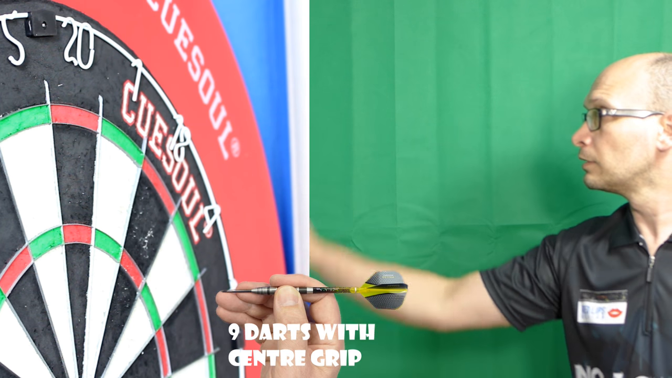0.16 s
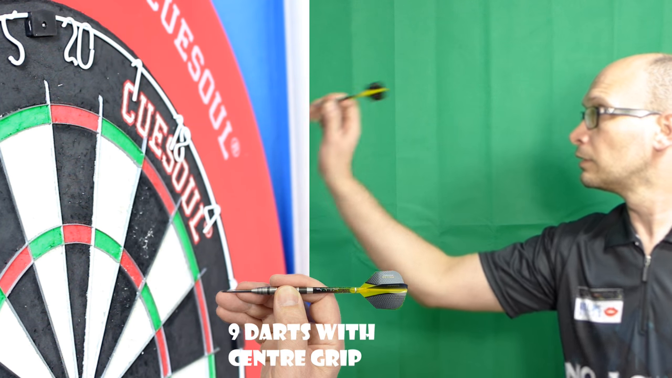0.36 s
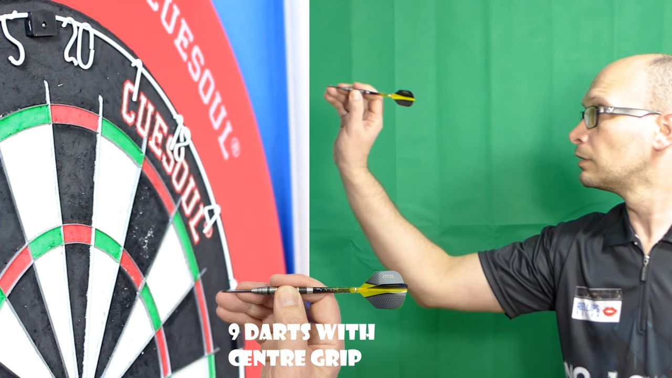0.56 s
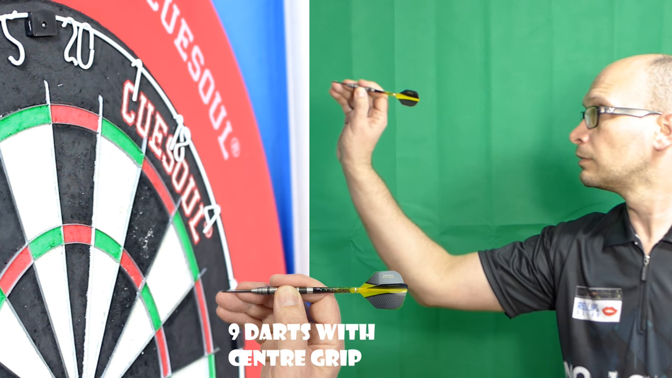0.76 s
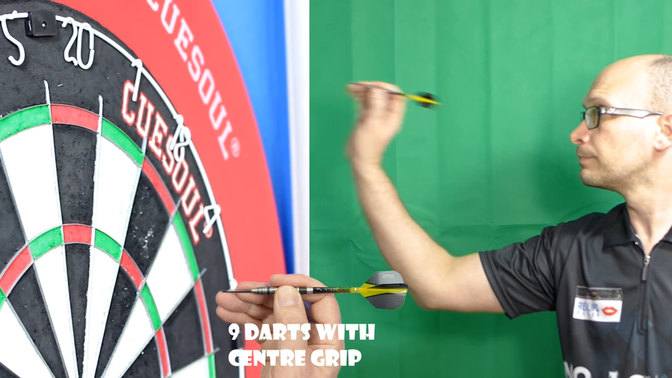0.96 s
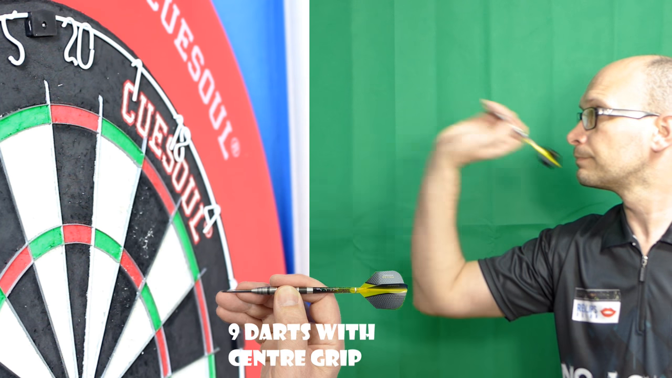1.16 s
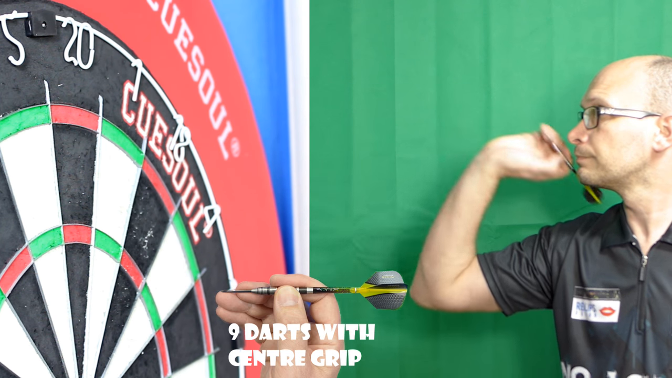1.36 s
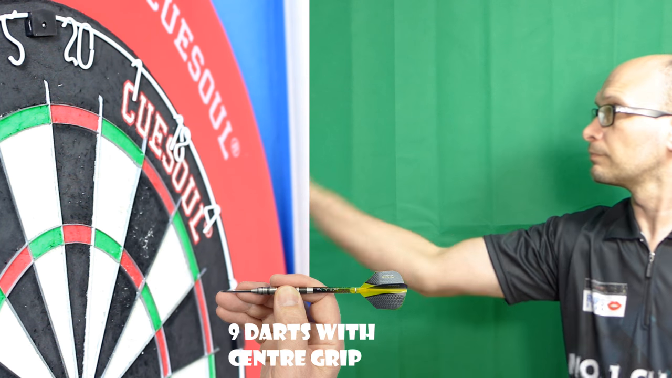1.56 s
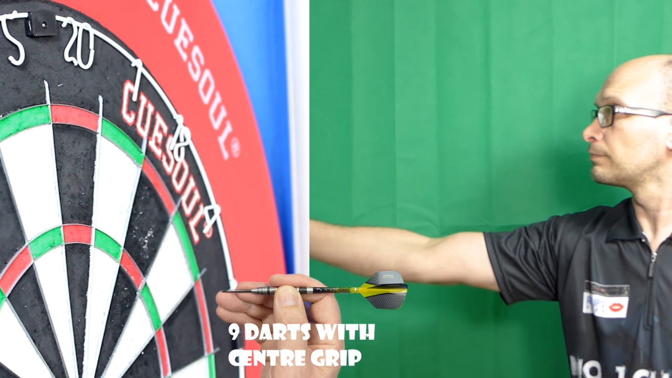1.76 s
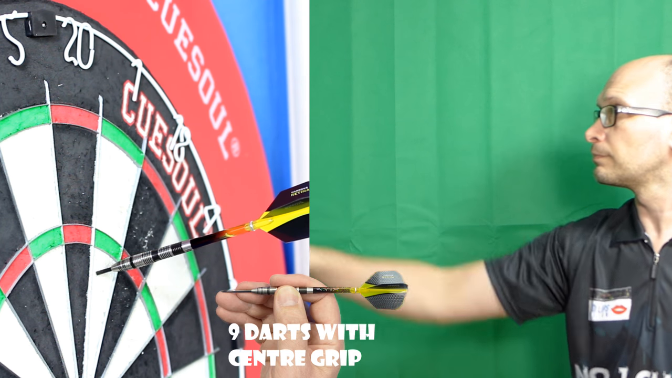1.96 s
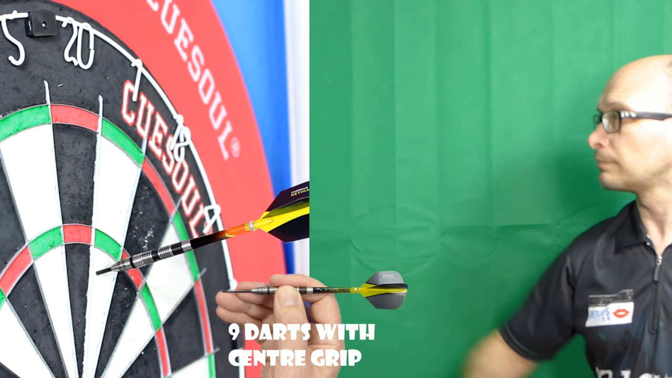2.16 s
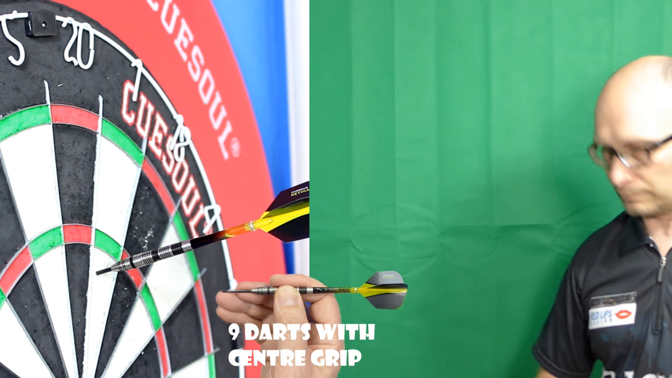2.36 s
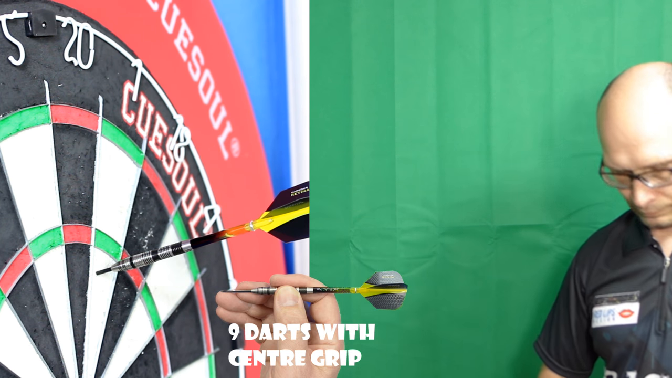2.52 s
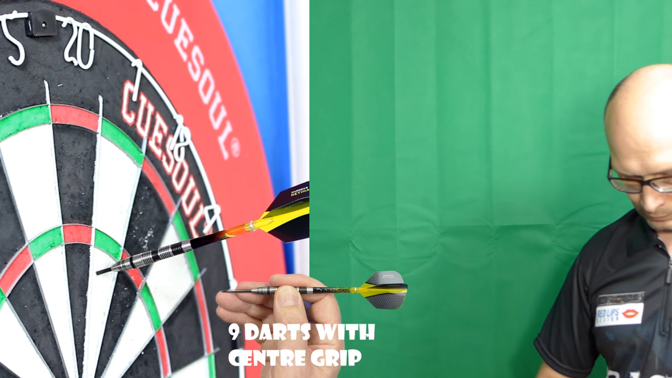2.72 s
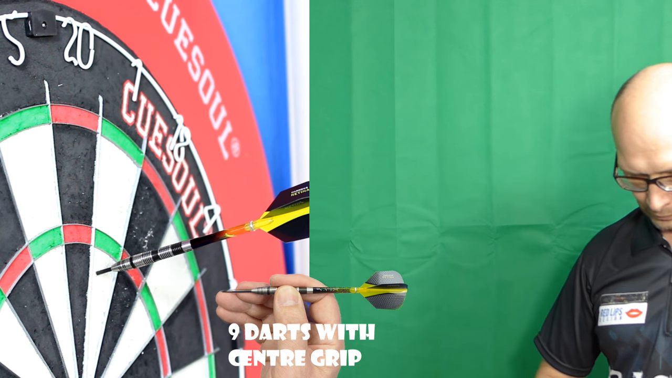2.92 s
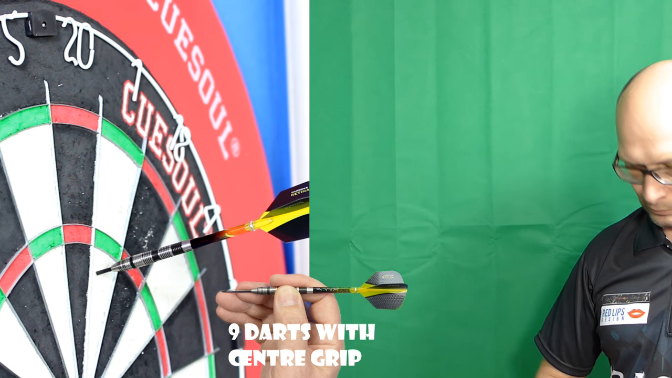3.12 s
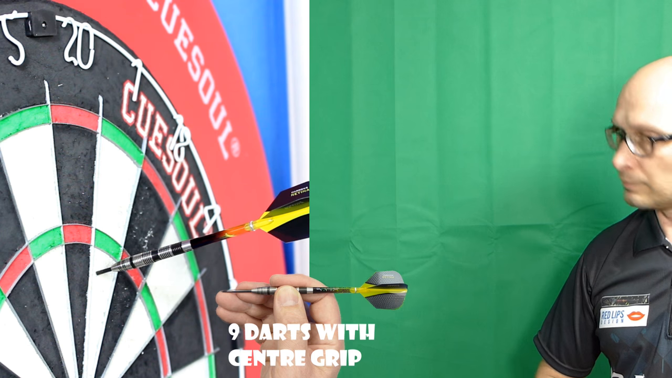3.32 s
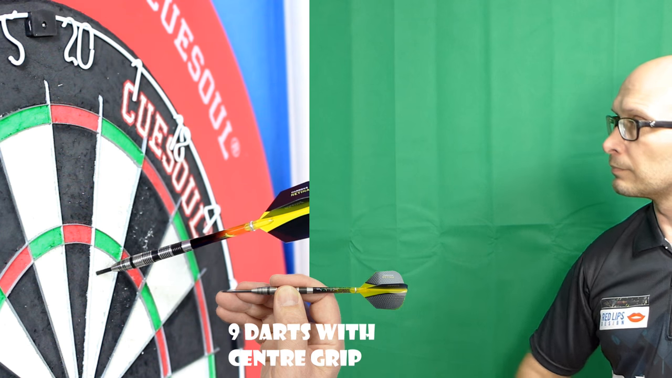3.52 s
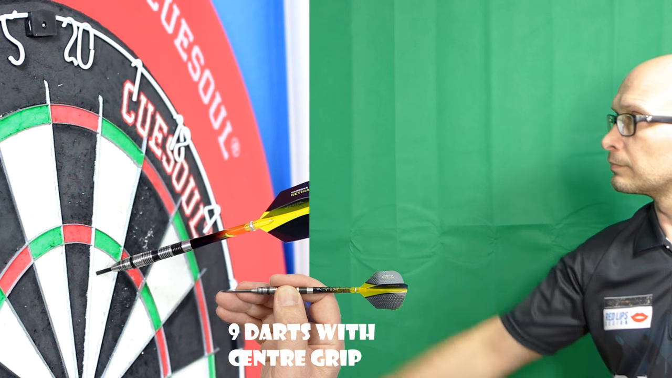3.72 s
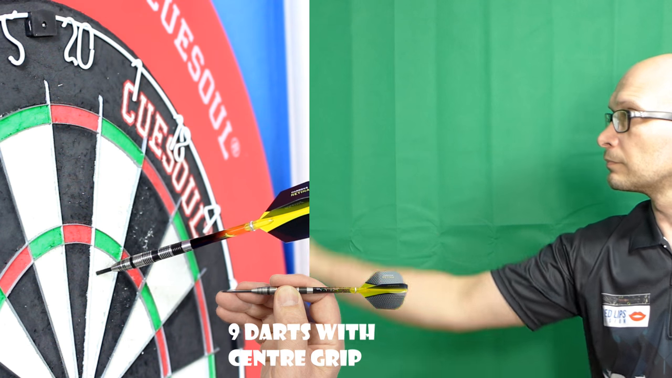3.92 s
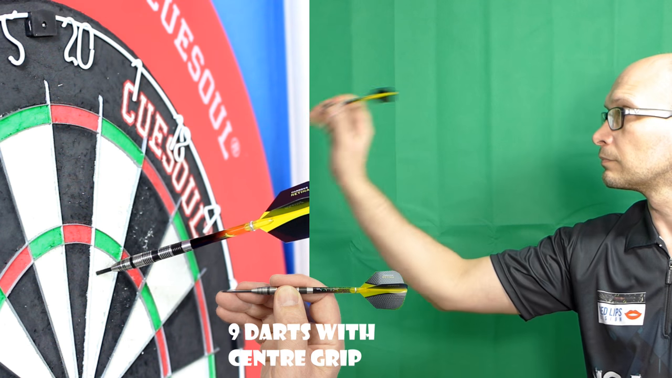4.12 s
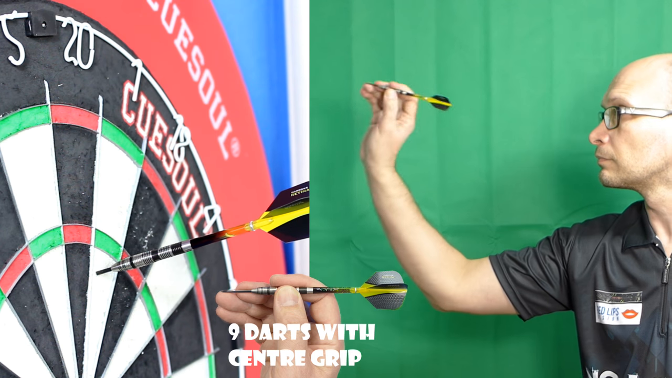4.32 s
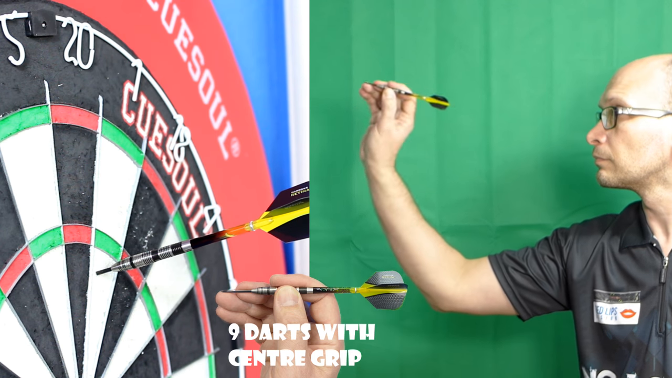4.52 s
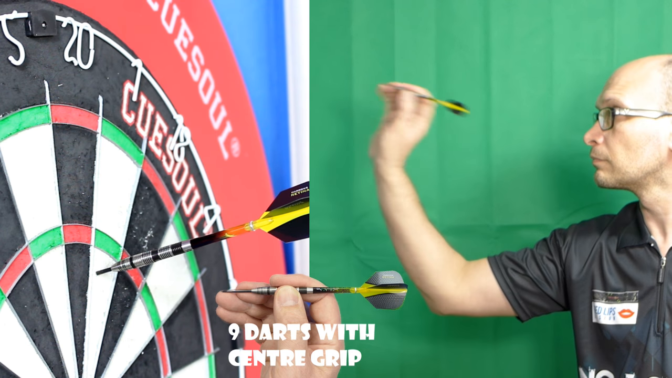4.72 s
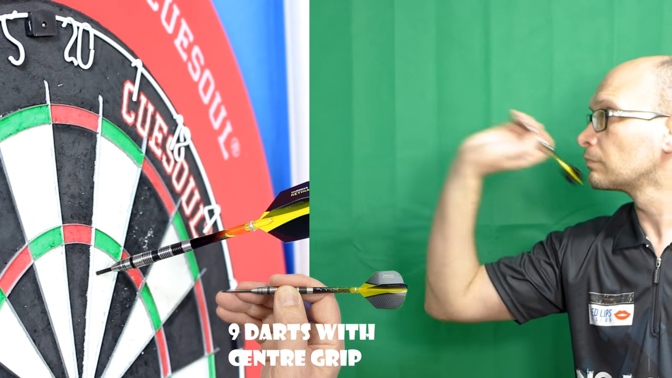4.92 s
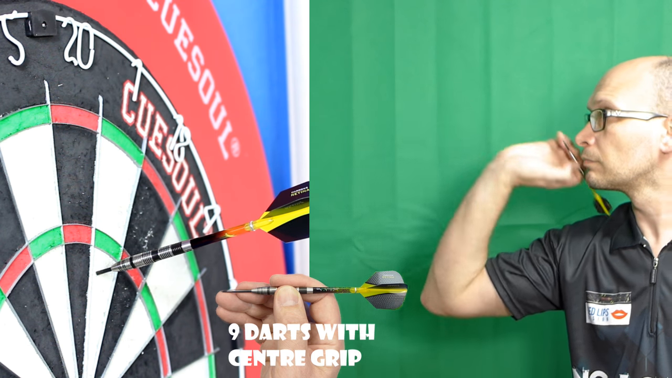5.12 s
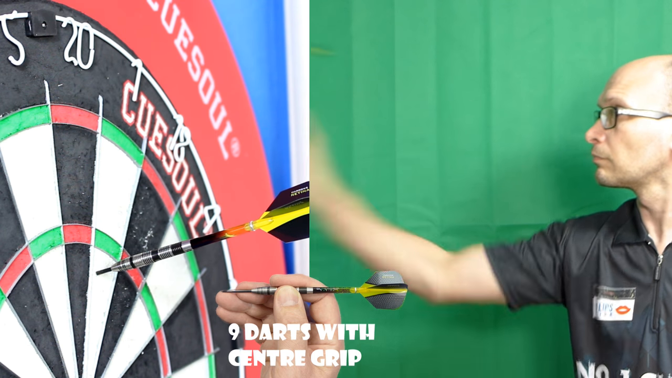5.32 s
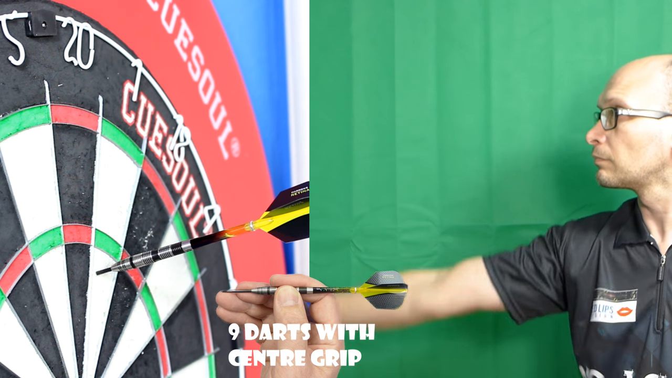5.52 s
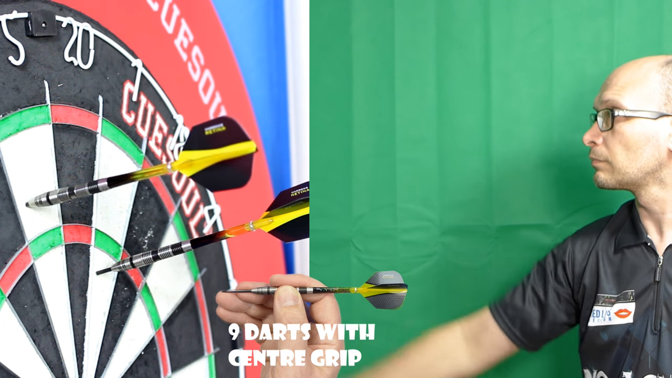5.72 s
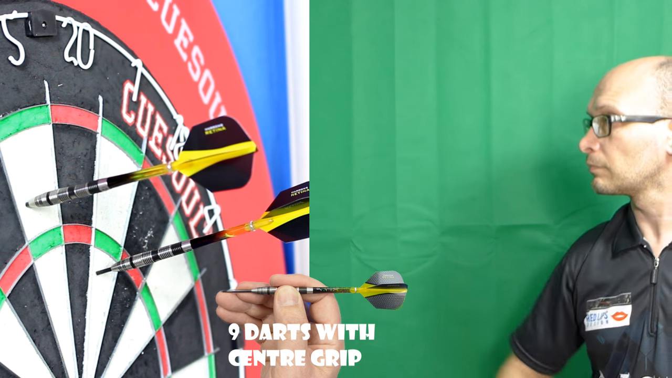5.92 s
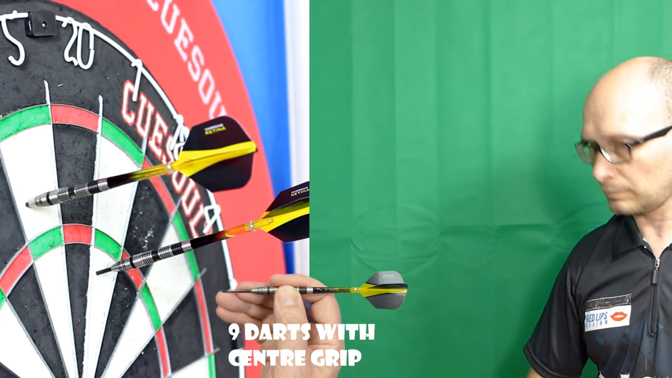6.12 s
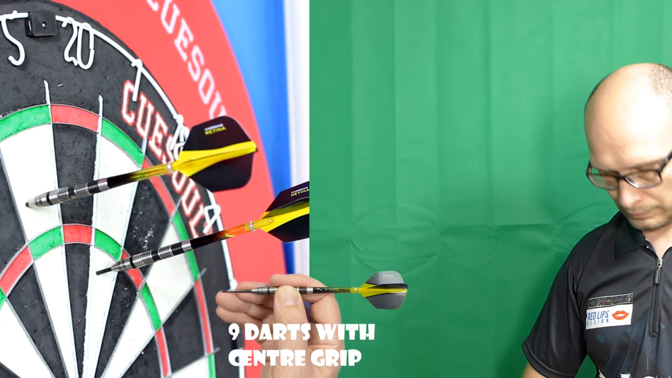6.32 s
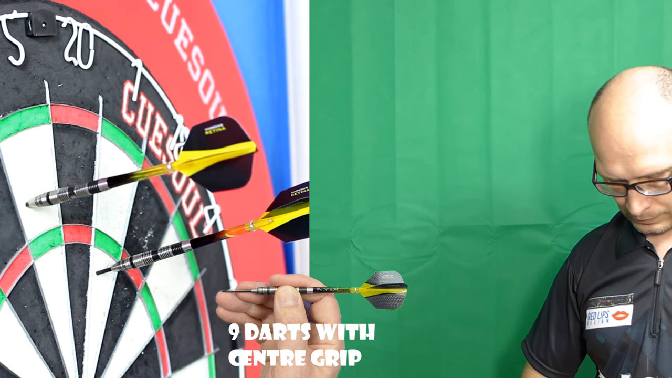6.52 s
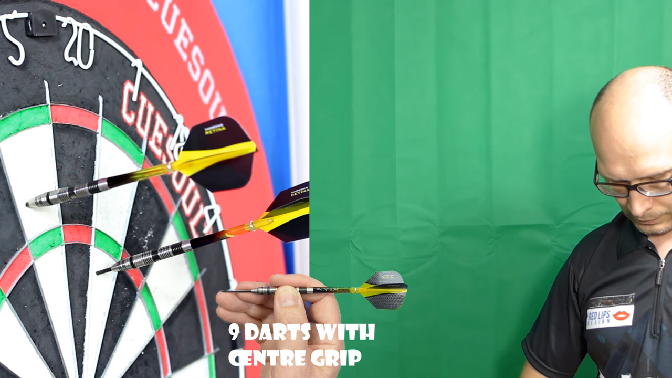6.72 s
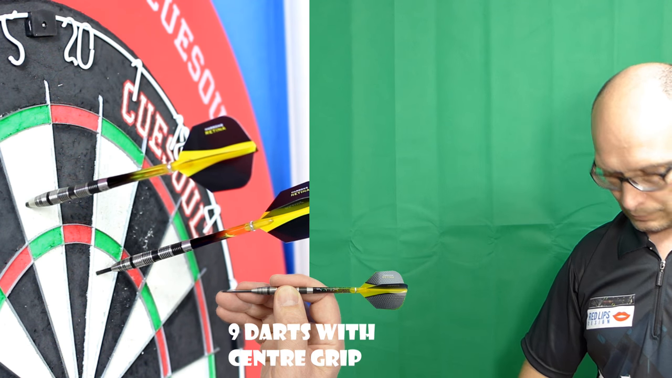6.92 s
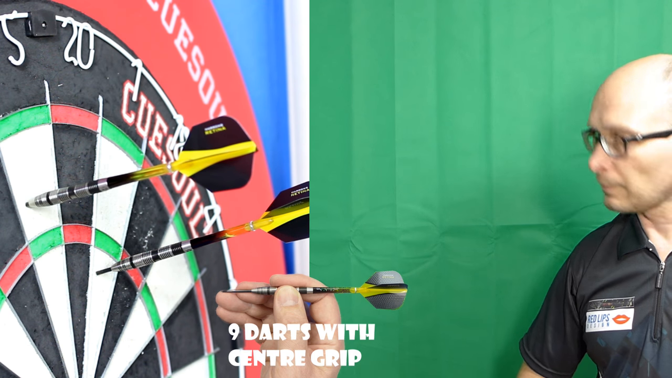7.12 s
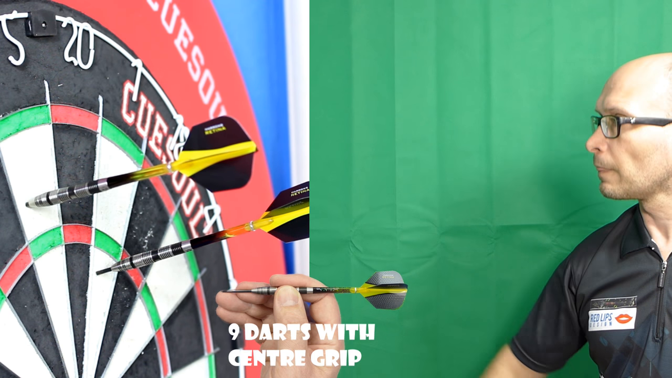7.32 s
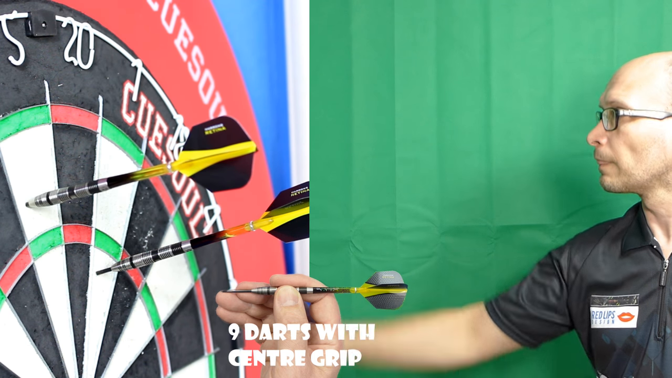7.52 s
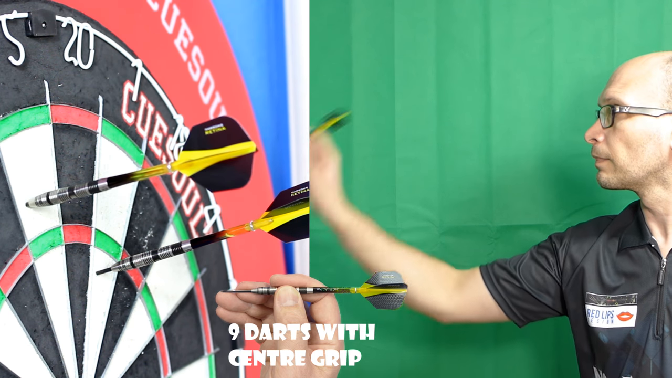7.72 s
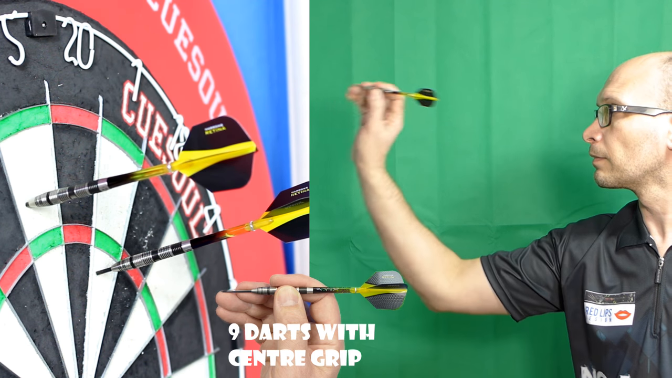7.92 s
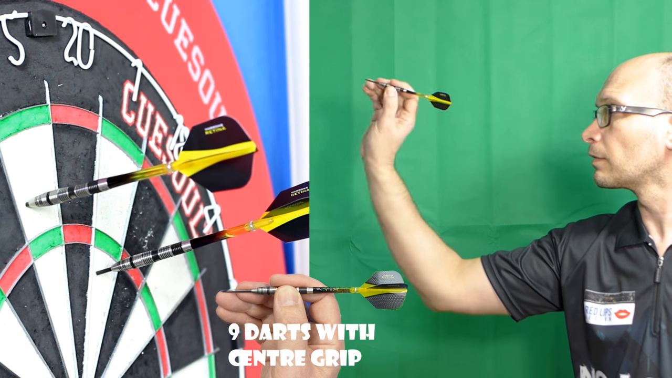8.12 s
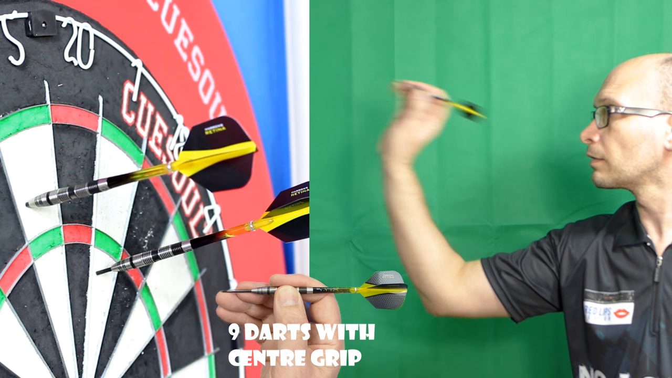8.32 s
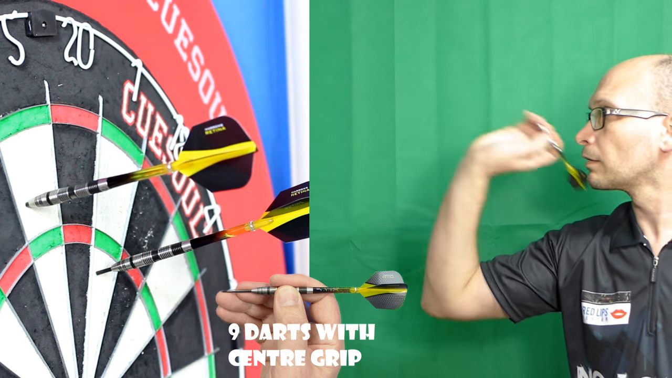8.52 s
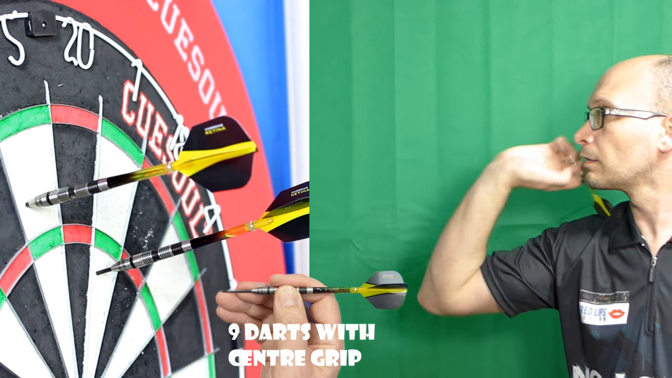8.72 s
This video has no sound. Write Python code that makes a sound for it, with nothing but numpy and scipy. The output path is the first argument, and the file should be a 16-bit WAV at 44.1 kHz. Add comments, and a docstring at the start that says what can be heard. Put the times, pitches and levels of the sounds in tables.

```python
"""Steel-tip darts in a quiet room

A player throws darts near a camera microphone pair. The flight scrapes the chin on the draw and flicks off it
at release: noise grains in three tones. Two darts thud into a bristle board: decaying sine modes with delayed
repeats boom under a crunch of room-decaying noise. A third draw ends the scene with no landing.
Shirt rustle (patchy noise), faint ticks (short noisy rings), a wavering narrow hum, a whine and hiss lie below.
"""
import sys
import numpy as np
from scipy import signal
from scipy.fft import rfft, irfft
from scipy.io import wavfile
from scipy.ndimage import uniform_filter1d

SR = 44100
rng = np.random.default_rng(int(sys.argv[2]) if len(sys.argv) > 2 else 0)


def int16_out(signal):
    """Quantize to a 16-bit WAV file."""
    q = np.round(np.clip(np.atleast_2d(signal).T, -1, 1) * 32767)
    wavfile.write(sys.argv[1], SR, q.astype(np.int16))


N = 386448  # length of the scene [samples]


def darts():
    """Each blow rings the board modes under a dense crunch of noise that decays with the room."""
    # darts landing: (time [s], level [dB], crunch share [dB], crunch top [dB], crunch bass [dB],
    # knock around 2 kHz [dB])
    landings = [(1.88, -26, -0.5, 6, 6.5, -2.5), (5.672, -22.5, 0.5, 2, 2, 0.5)]
    # point pushing into the fibres: (frequency [Hz], level [dB per Hz])
    fibre_colour = [(35, -63), (60, -40), (256, -18), (346, -5), (437, -1.5), (566, -8), (636, -6),
                    (1010, -9.5), (1250, -19.5), (2000, -20), (3120, -41), (4120, -36.5), (8710, -46),
                    (10800, -41), (16000, -68.5)]
    boom = board_boom()
    t = np.arange(SR) / SR
    fade_in = np.minimum(t / 0.00025, 1)
    fade_out = np.minimum(2 * (1 - t), 1)
    out = np.zeros((2, N))
    for start, db, crunch_db, top_db, bass_db, knock_db in landings:
        crunch = colour(tail(SR, 0.00112), fibre_colour)
        crunch = colour(crunch, [(220, bass_db), (300, 0), (1000, 0), (16000, top_db)])
        crunch /= opening_rms(crunch)
        blow = boom + from_db(crunch_db) * crunch
        blow = colour(blow, [(1100, 0), (1400, knock_db), (2700, knock_db), (3600, 0)])
        add(out, start, from_db(db) * blow * fade_in * fade_out)
    return out


def board_boom():
    """Decaying modes of board and backing, swelled by delayed repeats, over one low decaying thump."""
    # modes of board and backing: (frequency [Hz], level [dB], 60 dB decay, held to at most 0.5 [s])
    modes = [(272.8, -23, 0.38), (324.1, 2, 0.476), (353.14, 3, 0.475), (386.9, 3.5, 0.387),
             (432.7, -11, 0.38), (476.1, 0.5, 0.38), (502.2, 6, 0.25), (554, 9, 0.32), (595, 6, 0.143),
             (607.4, -7.5, 0.176), (677, -14.5, 0.14), (720, 3, 0.3), (752.7, -4, 0.49), (774, -3, 0.21),
             (833.4, 8.5, 0.3), (881.3, 2, 0.294), (909, -13, 0.74), (933.6, -3, 0.414), (1007, -9, 0.31),
             (1050.4, -7.5, 0.2), (1107, -16, 0.394), (1134.3, -14, 0.345), (1370, -15, 0.29),
             (1592.5, -15.5, 0.59), (1740, -19, .25), (1950, -9, 0.42), (2029, -11.5, 0.45),
             (2086, -15, 0.4)]
    # delayed repeats that shape the swell of the boom: (delay [s], level [dB])
    repeats = [(.009, 2.5), (.031, 2.5), (.047, -10), (.057, -2.5), (.084, -9.5), (.140, -18)]
    thump_hz, thump_db, thump_decay_s = 45, -25.5, 0.047
    t = np.arange(SR) / SR
    ring = np.zeros(SR)
    for k, (hz, db, t60) in enumerate(modes):
        # alternating signs soften the start of the boom
        ring += (-1) ** k * from_db(db - 60 * t / min(t60, 0.5)) * np.sin(2 * np.pi * hz * t)
    boom = ring.copy()
    for delay, db in repeats:
        lag = int(delay * SR)
        boom[lag:] += from_db(db) * ring[:SR - lag]
    # keep the abrupt mode starts from adding low rumble
    boom = signal.sosfilt(signal.butter(3, 240, "high", fs=SR, output="sos"), boom)
    boom /= opening_rms(boom)
    thump = np.sin(2 * np.pi * thump_hz * t) * np.exp(-t / thump_decay_s)
    return boom + from_db(thump_db) * thump


def flight():
    """Dragging the flight on the chin, then letting it spring off, opens its body, edge and ring tones."""
    # drags along the chin: (time of touch [s], swell [s], hold [s], peak level [dB],
    # hollow ring [dB relative to the body], bright edge [dB relative to the body])
    scrapes = [(1.322, 0.0432, 0.039, -48, -28, 0), (5.025, 0.0107, 0.0345, -53, -17, 7),
               (5.097, 0.0069, .008, -50, -7.5, 3.5), (8.609, 0.0527, 0.0194, -50, -23, 1)]
    # springing off at release: (time [s], level [dB], snap length [s], quiver decay [s],
    # ring [dB relative to the body], edge [dB relative to the body])
    flicks = [(1.511, -43, 0.011, 0.0212, -18.5, 1.5), (5.2965, -37.5, 0.011, 0.0122, -8.5, 2)]
    # how the grip stiffens the flight on each throw: (from time [s], body band low edge [Hz],
    # body peak [Hz], ring [Hz], ring width [Hz])
    grips = [(0, 4623, 5290, 2016, 200), (4, 4110, 5210, 2050, 306), (8, 4700, 5800, 2300, 900)]
    ring_db_per_s, edge_db_per_s = 109, -87.5  # along a stroke the ring grows and the edge dulls
    body_level, edge_level, ring_level = np.zeros((3, N))
    for start, swell, hold, db, ring_db, edge_db in scrapes:
        t, shape_db = stroke(swell, hold)
        add(body_level, start, from_db(db + shape_db))
        add(edge_level, start, from_db(db + shape_db + edge_db + edge_db_per_s * t))
        add(ring_level, start, from_db(db + shape_db + ring_db + ring_db_per_s * t))
    t = np.arange(SR // 4) / SR
    for start, db, length, quiver, ring_db, edge_db in flicks:
        snap = np.minimum(t / 0.005, 1) * (t < length)
        shape = snap + from_db(-1.0) * (t >= length) * np.exp(-(t - length) / quiver)
        add(body_level, start, from_db(db) * shape)
        add(edge_level, start, from_db(db + edge_db) * snap)
        add(ring_level, start, from_db(db + ring_db) * shape)
    tones = np.zeros((3, N))
    for start, *grip_hz in grips:
        first = int(start * SR)
        tones[:, first:] = flight_tones(*grip_hz)[:, first:]
    return np.sum(tones * [body_level, edge_level, ring_level], axis=0)


def flight_tones(low_hz, peak_hz, ring_hz, width_hz):
    """Stubble plucks the thin plastic in dense uneven grains: body band, bright edge and hollow ring."""
    # colour of the rubbed flight: (frequency [Hz], level [dB per Hz])
    plastic_colour = [(1000, -10.5), (1700, -1), (2500, -6.5), (3300, -9), (4000, -4), (4700, -1.5),
                      (5400, 1), (6200, -4), (6800, -4), (10700, -6.5), (12200, -8.5), (12800, -17),
                      (15000, -17.5), (16000, -31)]
    grains = rng.standard_normal(N) * from_db(2.97 * walk(400))
    hiss = colour(grains, plastic_colour)
    body = colour(hiss, [(0.6 * low_hz, -17), (0.89 * low_hz, -13), (low_hz, -3),
                         (peak_hz, 2), (6600, -3), (8000, -30)])
    edge = colour(hiss, [(6000, -18), (7500, -2.5)])
    ring = band(grains, ring_hz, width_hz)
    return np.array([unit(body), unit(edge), unit(ring)])


def stroke(swell, hold):
    """Time and dB shape of one drag: touch, swell, hold, then a fade as the flight leaves the skin."""
    touch_db, lift_db_per_s = -9.5, 335.5  # first contact relative to the peak; speed of the fade
    t = np.arange(SR // 4) / SR
    rise_db = touch_db * np.maximum(1 - t / swell, 0)
    lift_db = lift_db_per_s * np.maximum(t - swell - hold, 0)
    return t, rise_db - lift_db


def dry_ticks():
    """Small dry ticks through the scene, and short bright ticks at the onset of each blow."""
    # faint ticks: (time [s], peak level [dB], pitch [Hz])
    faint = [(1.5203, -36.5, 7900), (3.989, -54, 4630), (4.378, -50, 4900), (5.1078, -35.5, 9000),
             (5.326, -30, 5530), (6.537, -48, 4870), (7.418, -41, 5100)]
    # short bright ticks at the onset of each blow: (time [s], peak level [dB], pitch [Hz])
    onsets = [(1.877, -31, 5200), (5.671, -40.5, 4740)]
    return knocks(faint, 16.1, 0.397) + knocks(onsets, 25.0, 0.58)


def bumps():
    """A soft low bump in a few quick contacts as the player shifts."""
    # contacts: (time [s], peak level [dB], pitch [Hz])
    shifts = [(2.46, -48, 700), (2.495, -49, 316), (2.52, -51, 450)]
    return knocks(shifts, 3.64, 0.9)


def knocks(contacts, cycles, spread):
    """Each small contact is a few cycles of noisy ring; spread is its bandwidth over its pitch."""
    out = np.zeros(N)
    for start, db, hz in contacts:
        turns = np.arange(int(6 * cycles * SR / hz)) * hz / SR
        noise = band(rng.standard_normal(len(turns)), hz, spread * hz)
        knock = noise * turns * np.exp(-2 * turns / cycles)
        add(out, start, from_db(db) * knock / np.abs(knock).max())
    return out


def shirt():
    """Cloth rubbing as the arm moves: patchy fine grain that swells and fades with each move."""
    # arm moves: (time of loudest rub [s], peak level [dB], swell over 20 dB [s], fade over 20 dB [s])
    moves = [(0.0, -63, .1, 0.273), (.27, -60, 0.66, 0.18), (1.64, -56, .06, .4), (4.02, -65.5, 0.19, 0.04),
             (5.4, -56.5, 0.043, 0.1837), (5.64, -64, 0.228, 0.13), (7.865, -59.5, .05, .12),
             (7.72, -68, .3, .3)]
    # colour of the cloth: (frequency [Hz], level [dB per Hz])
    cloth_colour = [(180, -40), (300, -9.5), (584, -1), (749, -8), (978, -1.5), (3580, -12), (4670, -5),
                    (13500, -20.5), (16000, -39.5)]
    t = np.arange(N) / SR
    level = np.zeros(N)
    for peak, db, swell, fade in moves:
        level += from_db(db - 20 * np.maximum((peak - t) / swell, (t - peak) / fade))
    grain = rng.standard_normal(N) * from_db(1.52 * walk(60))
    return level * unit(colour(grain, cloth_colour))


def air():
    """Gently drifting hiss and rumble, coloured noise partly shared by both sides, with a thin high whine."""
    # colour of the room air: (frequency [Hz], level [dB])
    air_colour = [(12, -34.5), (20, -12.5), (22, -16), (33, -24), (120, -23), (172, -17.5), (210, -15.5),
                  (472, -16), (527, -14.5), (849, -16.5), (1060, -15), (3070, -30), (4940, -27.5),
                  (9140, -31.5), (16000, -38.5)]
    # left-right likeness of the room air: (frequency [Hz], correlation [-1..1])
    likeness = [(60, 0.98), (130, 0.79), (290, 0.28), (640, -0.593), (1410, -0.77), (3100, -0.215),
                (6820, 0.164), (15000, 0.647)]
    air_db, drift_db = -56, 0.583
    whine_hz, whine_db = 15625, -89
    hiss = unit(colour(pair(N, likeness), air_colour))
    whine = np.sqrt(2) * np.sin(2 * np.pi * whine_hz * np.arange(N) / SR)
    return hiss * from_db(air_db + drift_db * walk(1.964)) + from_db(whine_db) * whine


def wavering_hum():
    """A tone smeared by slow noise into a narrow band, wavering in level."""
    # the wavering: (time [s], level [dB])
    waver = [(0.0, -70), (0.3, -73.5), (1.15, -64), (1.6, -62), (2.37, -61), (2.8, -68.5), (3.34, -71),
             (3.54, -62.5), (3.75, -68), (4.1, -62), (4.49, -74), (4.85, -72), (5.65, -64.5), (6.05, -65.5),
             (6.5, -74), (7.08, -66.5), (8.08, -69.5), (8.35, -76), (8.76, -68.5)]
    hum_hz, width_hz = 550.4, 56.3
    times, levels_db = np.transpose(waver)
    t = np.arange(N) / SR
    smoother = signal.butter(2, width_hz / 2, fs=SR, output="sos")
    slow = signal.sosfilt(smoother, rng.standard_normal((3, 2, N)))
    turn = 2 * np.pi * hum_hz * t
    shared, left, right = slow[:, 0] * np.cos(turn) + slow[:, 1] * np.sin(turn)
    hum = unit(shared + 0.736 * np.array([left, right]))
    return hum * from_db(np.interp(t, times, levels_db))


def tail(size, build_s):
    """Diffuse room decay: noise in octaves, each scaled by its fade's energy, filling in over build_s."""
    # left-right likeness of the room decay: (frequency [Hz], correlation [-1..1])
    room_likeness = [(60, 0.985), (600, 0.988), (1500, 0.707), (5000, 0.707), (15000, 0.326)]
    # room decay: (frequency [Hz], 60 dB decay [s])
    room_decay = [(100, 0.485), (400, 0.406), (2000, 0.4284), (6000, 0.379), (14000, 0.182)]
    t = np.arange(size) / SR
    hz = np.fft.rfftfreq(size, 1 / SR)
    noise = rfft(pair(size, room_likeness))
    out = np.zeros((2, size))
    for centre in 62.5 * 2.0 ** np.arange(9):
        octaves_away = np.log2(np.maximum(hz, 1) / centre)
        share = np.cos(np.pi / 2 * np.clip(octaves_away, -1, 1)) ** 2
        fade = from_db(-60 * t / at(centre, room_decay)) * (1 - np.exp(-t / build_s))
        out += irfft(noise * share, size) * fade / np.sqrt(np.sum(fade ** 2))
    return out


def pair(size, likeness):
    """Left and right noise from a shared and an opposed part."""
    c = np.clip(at(np.fft.rfftfreq(size, 1 / SR), likeness), -0.99, 0.99)
    weights = np.sqrt([(1 + c) / 2, (1 - c) / 2])
    mid, side = rfft(rng.standard_normal((2, size))) * weights
    return irfft(np.array([mid + side, mid - side]), size)


def walk(rate_hz):
    """Random levels held for 1 / rate_hz seconds and slewed twice; spread near 1."""
    hold = int(SR / rate_hz)
    steps = np.repeat(rng.standard_normal(N // hold + 1), hold)
    return 1.374 * uniform_filter1d(uniform_filter1d(steps, hold), hold)[:N]


def colour(x, spectrum):
    """Filter by a (frequency [Hz], level [dB]) spectrum."""
    hz = np.fft.rfftfreq(x.shape[-1], 1 / SR)
    return irfft(rfft(x) * from_db(at(hz, spectrum)), x.shape[-1])


def band(x, hz, width_hz):
    """Band-pass around a centre frequency."""
    edges = [hz - width_hz / 2, hz + width_hz / 2]
    return signal.sosfilt(signal.butter(2, edges, "band", fs=SR, output="sos"), x)


def at(hz, curve):
    """Read a (frequency [Hz], value) curve on a log-frequency axis."""
    f, values = np.transpose(curve)
    return np.interp(np.log(np.maximum(hz, 1)), np.log(f), values)


def from_db(db):
    """Decibels to amplitude."""
    return 10 ** (np.asarray(db) / 20)


def unit(x):
    """Scale to an RMS of 1."""
    return x / np.sqrt(np.mean(x ** 2))


def opening_rms(x):
    """RMS of the first tenth of a second."""
    return np.sqrt(np.mean(x[..., :SR // 10] ** 2))


def add(out, start, x):
    """Mix x into out from a start time in seconds."""
    i = int(start * SR)
    out[..., i:i + x.shape[-1]] += x[..., :N - i]


def scene():
    """Player and ticks, direct and through the room, with the board and the background."""
    ticks = dry_ticks()
    player = flight() + shirt() + bumps()
    room_send = player + from_db(-11.0) * ticks
    wet = signal.fftconvolve(room_send[None], tail(SR // 2, 0.00257), axes=1)[:, :N]
    direct = from_db(-1.5) * player + ticks
    # the player stands to the right; the camera body shades the left port, most in the treble
    left = colour(direct, [(1000, -2), (6000, -4.5)])
    direct = np.array([left, direct])
    return direct + from_db(-1.0) * wet + darts() + air() + wavering_hum()


def record(dry):
    """A small constant offset and a steep top cut."""
    offset, top_hz = -0.00295, 15750
    top_cut = signal.ellip(10, 0.2, 70, top_hz, fs=SR, output="sos")
    return signal.sosfilt(top_cut, dry + offset)


dry = scene()
out = record(dry)
int16_out(out)
```